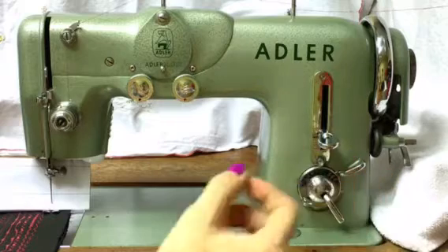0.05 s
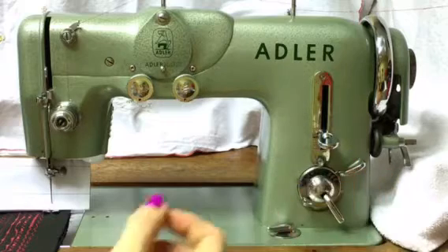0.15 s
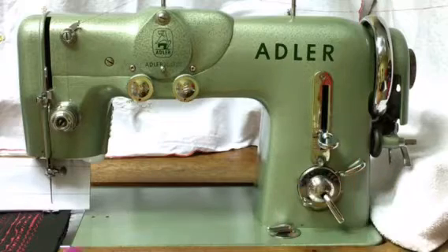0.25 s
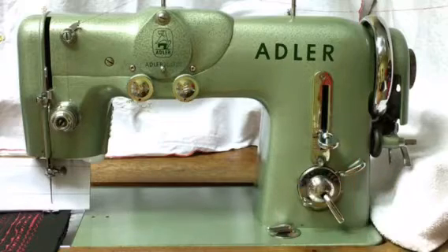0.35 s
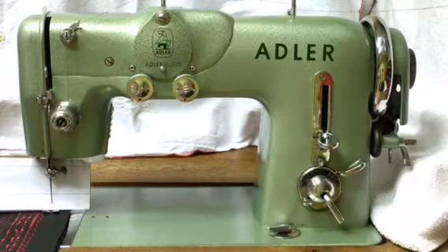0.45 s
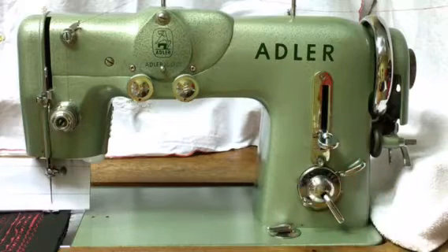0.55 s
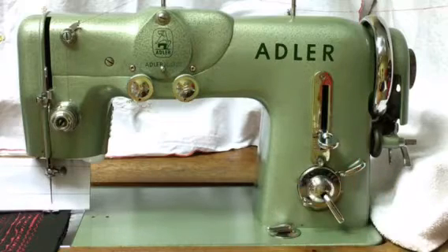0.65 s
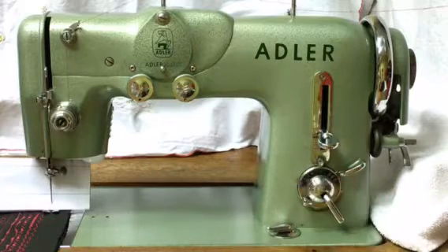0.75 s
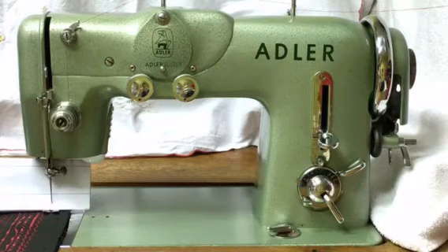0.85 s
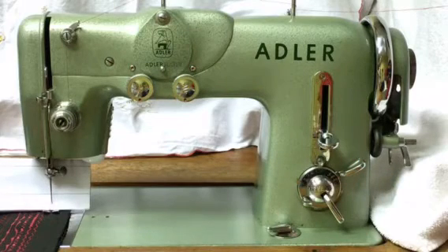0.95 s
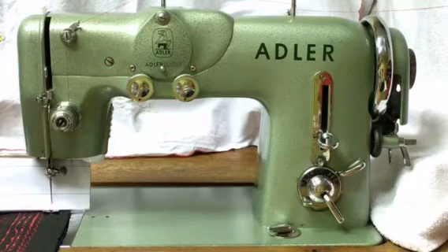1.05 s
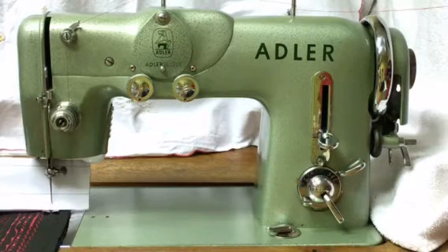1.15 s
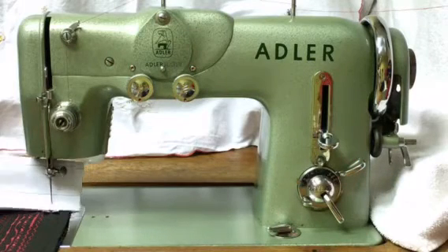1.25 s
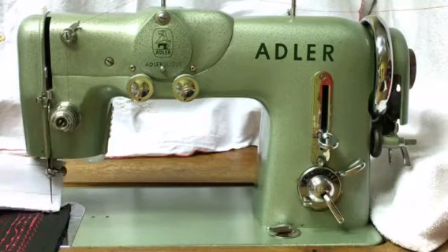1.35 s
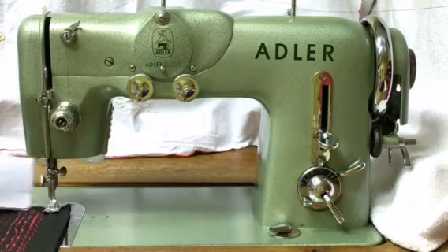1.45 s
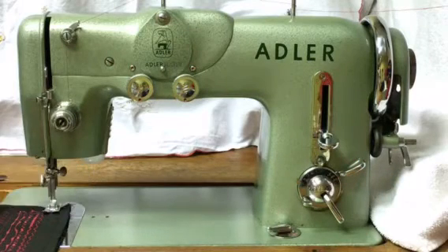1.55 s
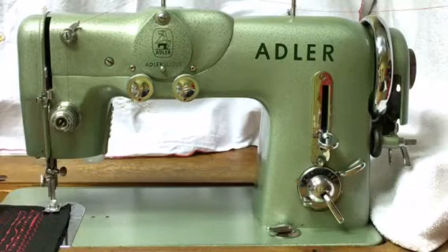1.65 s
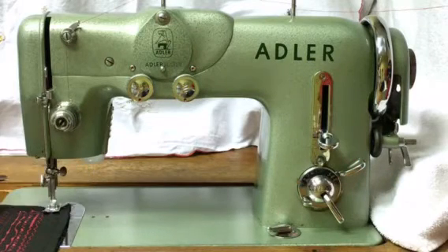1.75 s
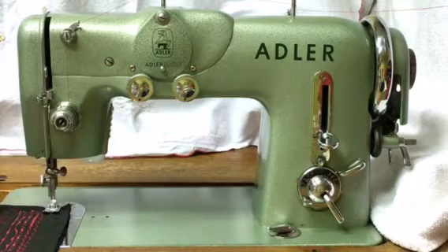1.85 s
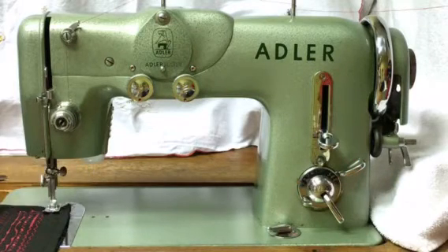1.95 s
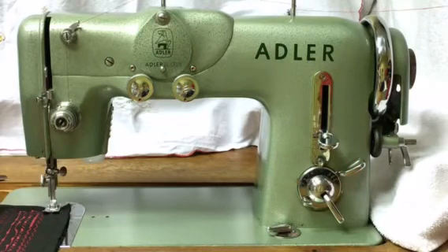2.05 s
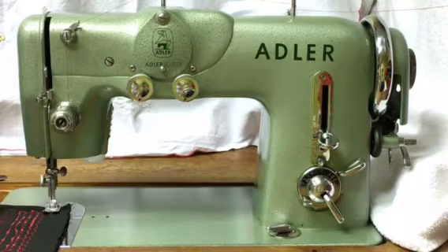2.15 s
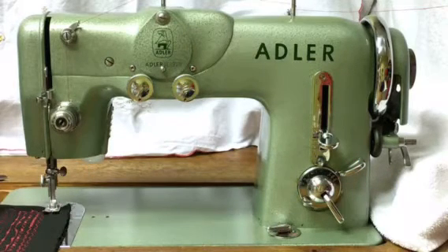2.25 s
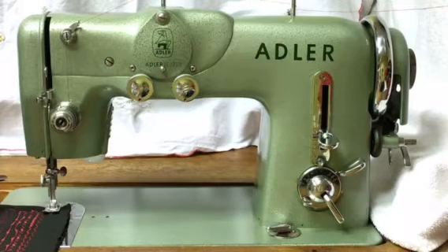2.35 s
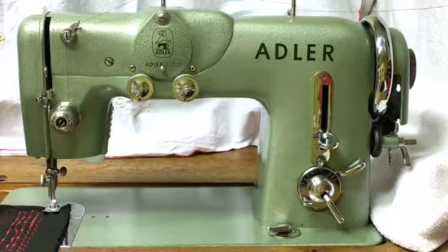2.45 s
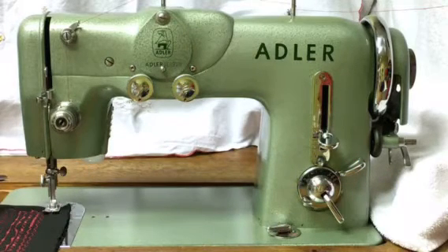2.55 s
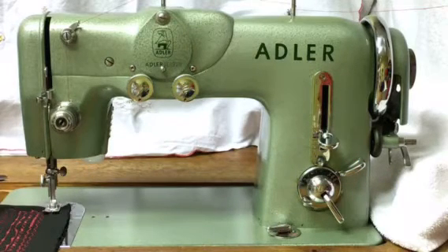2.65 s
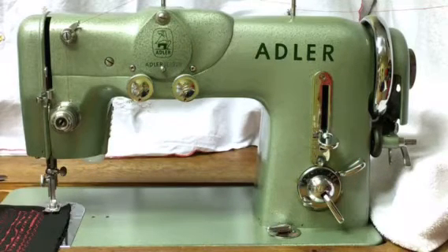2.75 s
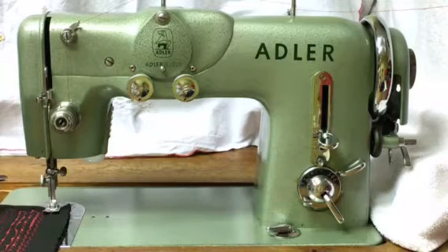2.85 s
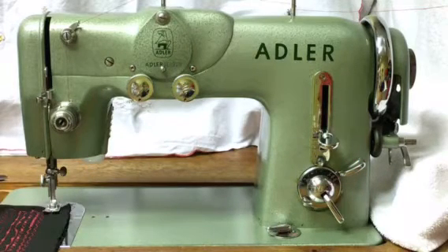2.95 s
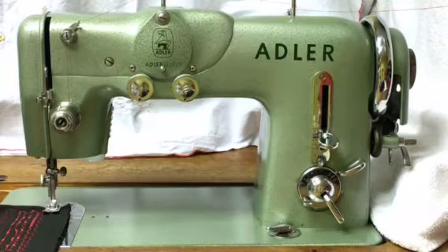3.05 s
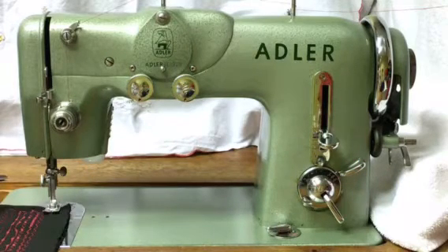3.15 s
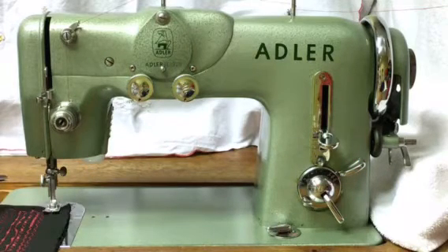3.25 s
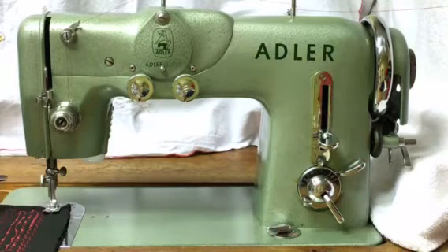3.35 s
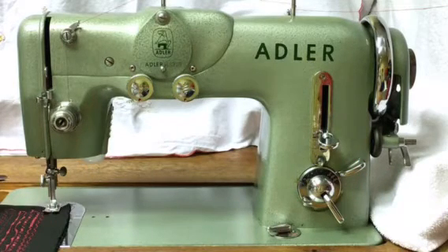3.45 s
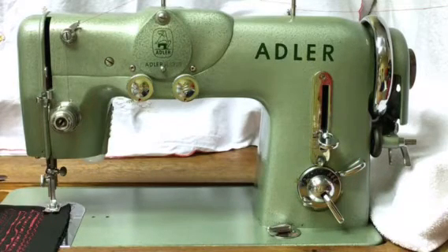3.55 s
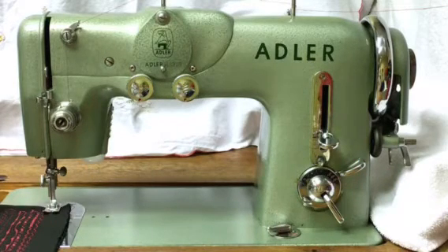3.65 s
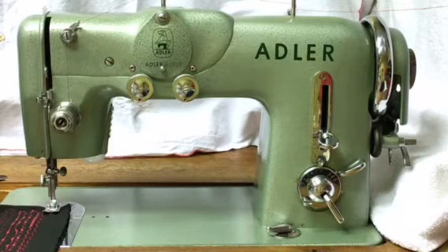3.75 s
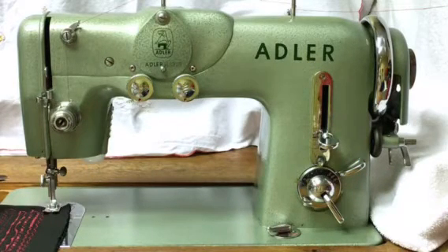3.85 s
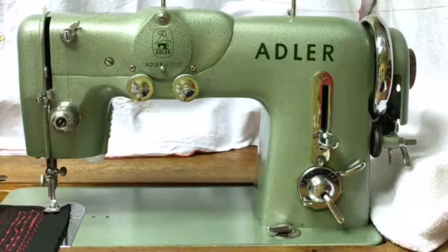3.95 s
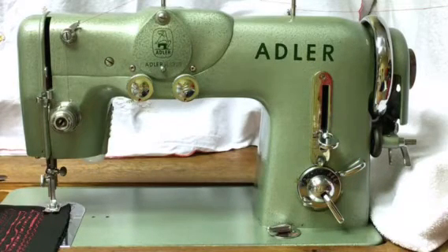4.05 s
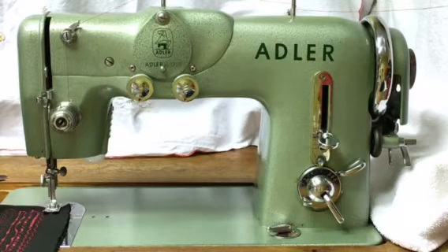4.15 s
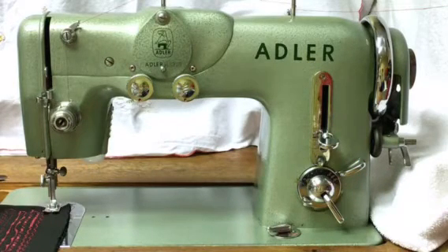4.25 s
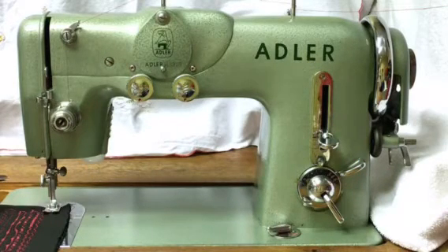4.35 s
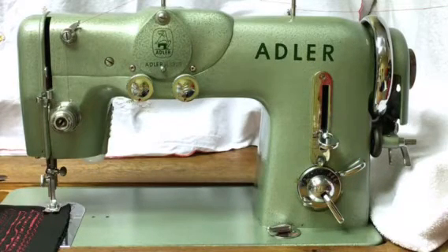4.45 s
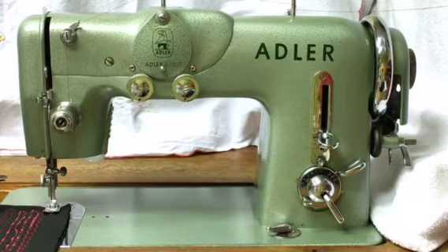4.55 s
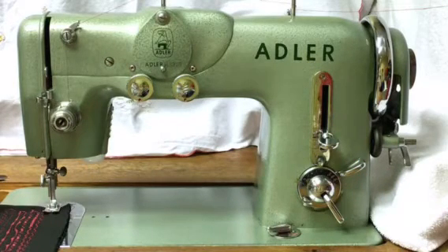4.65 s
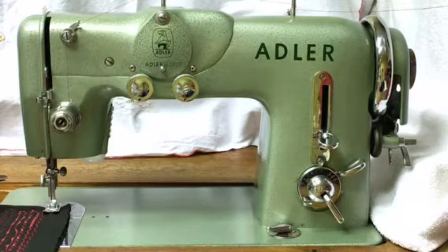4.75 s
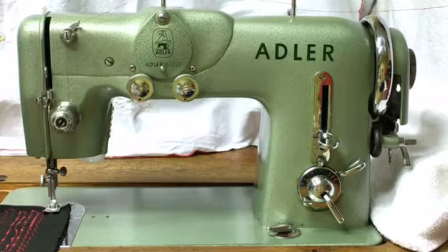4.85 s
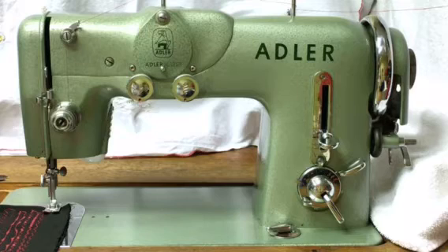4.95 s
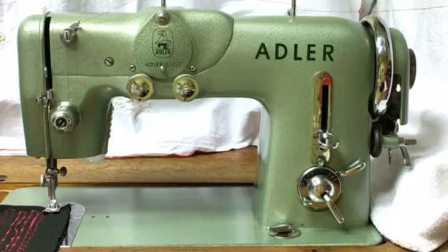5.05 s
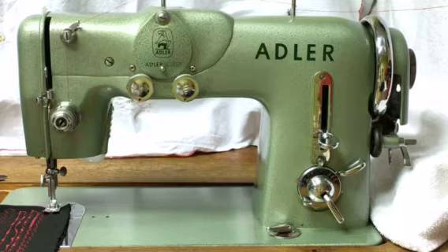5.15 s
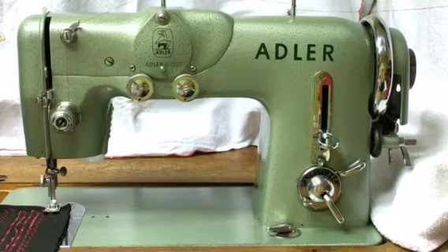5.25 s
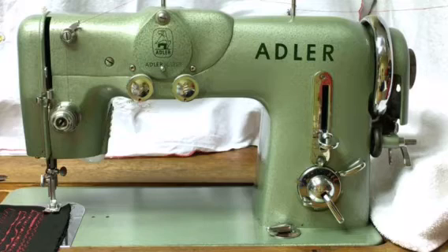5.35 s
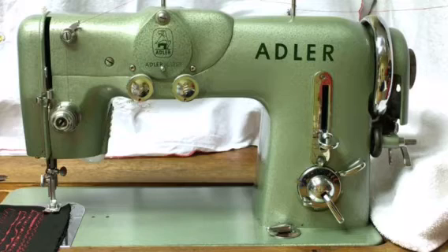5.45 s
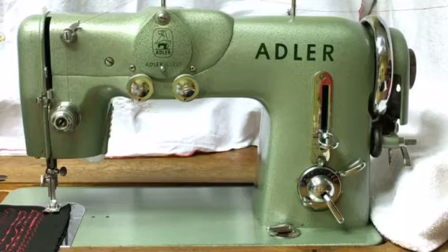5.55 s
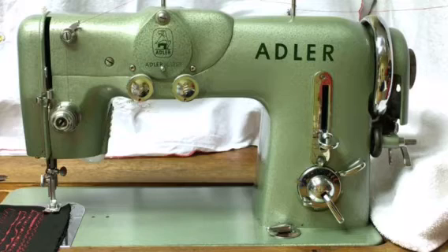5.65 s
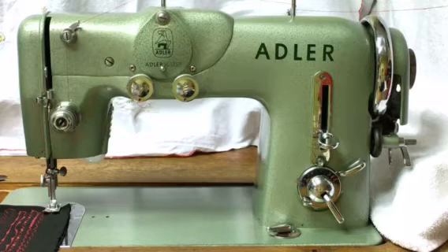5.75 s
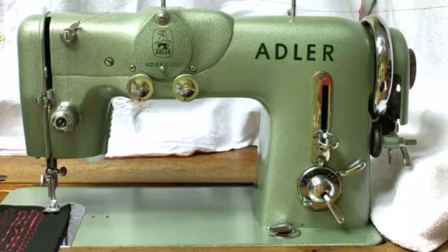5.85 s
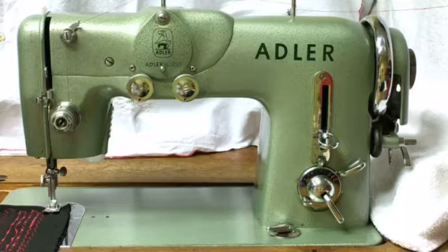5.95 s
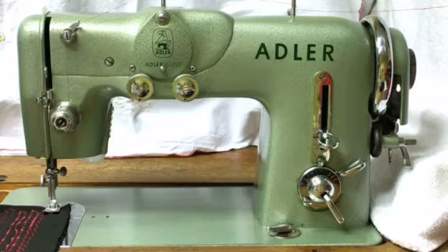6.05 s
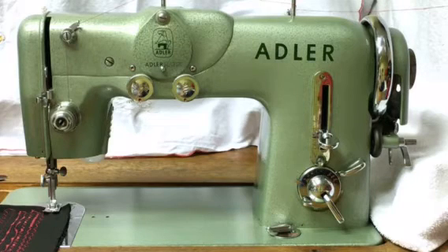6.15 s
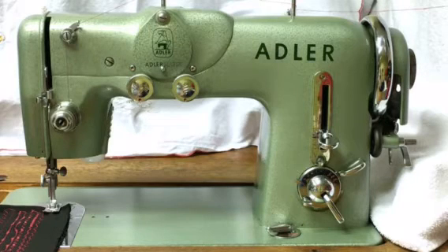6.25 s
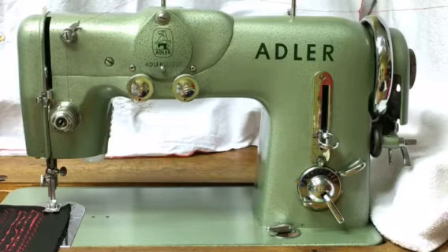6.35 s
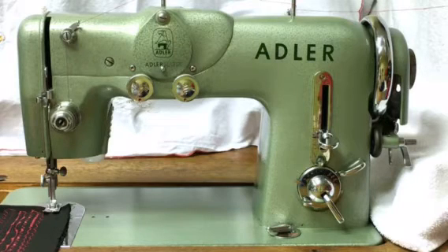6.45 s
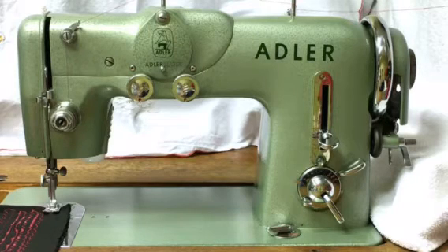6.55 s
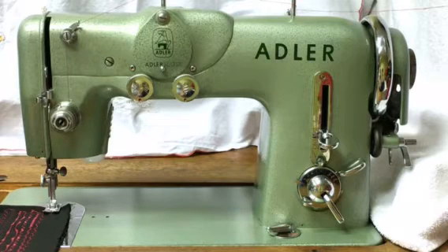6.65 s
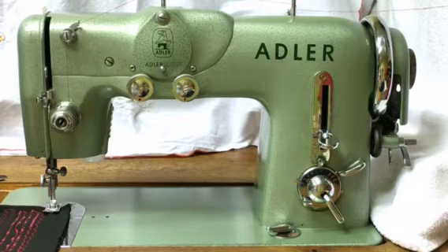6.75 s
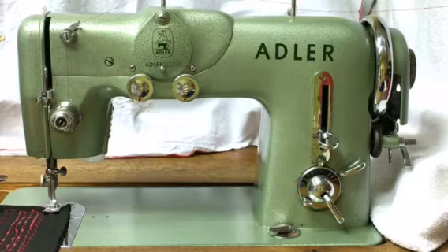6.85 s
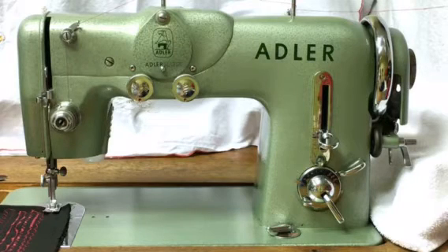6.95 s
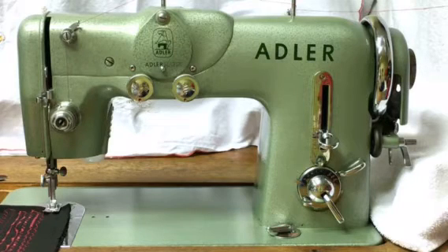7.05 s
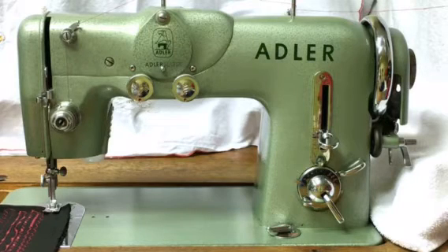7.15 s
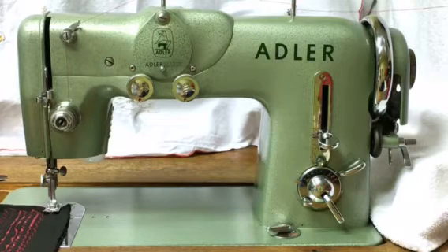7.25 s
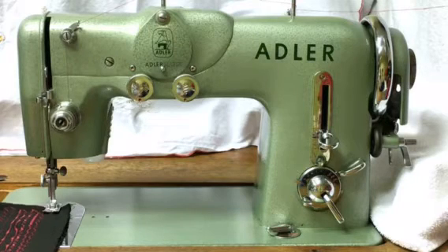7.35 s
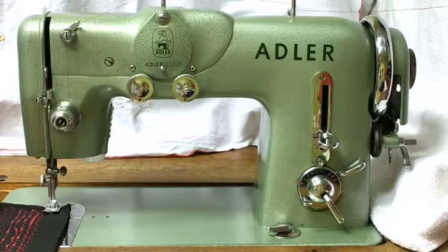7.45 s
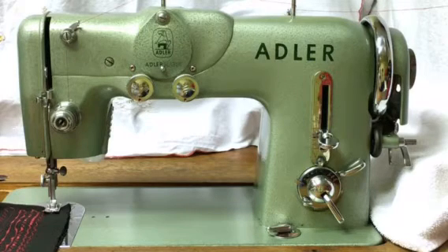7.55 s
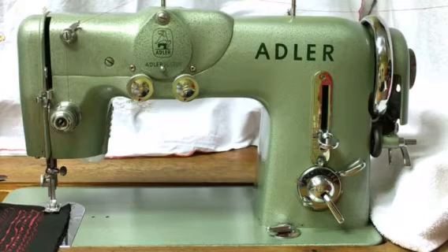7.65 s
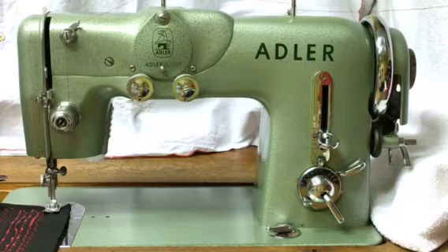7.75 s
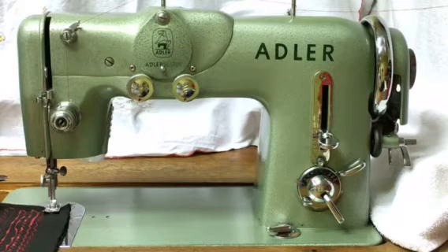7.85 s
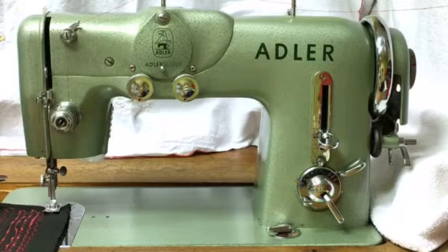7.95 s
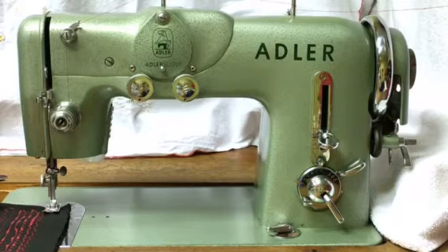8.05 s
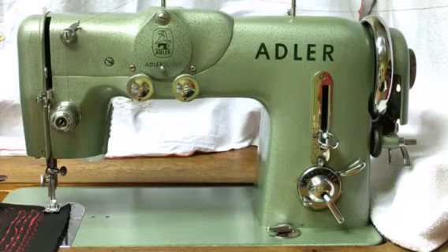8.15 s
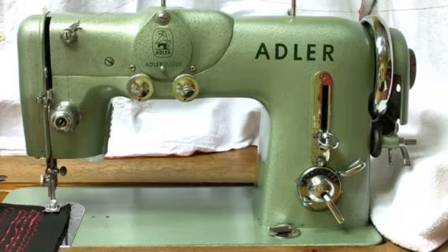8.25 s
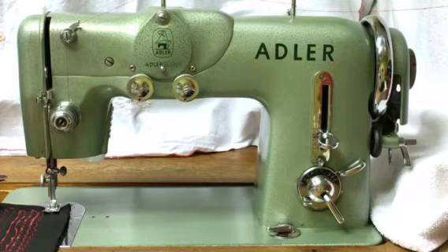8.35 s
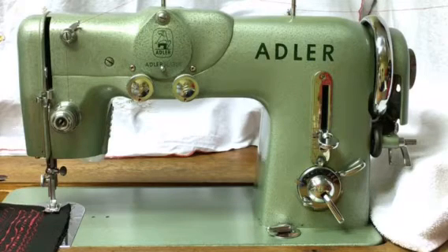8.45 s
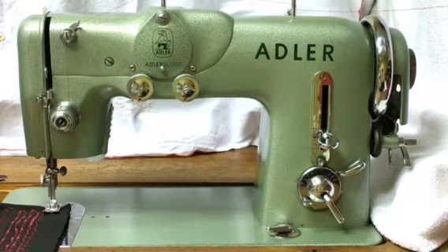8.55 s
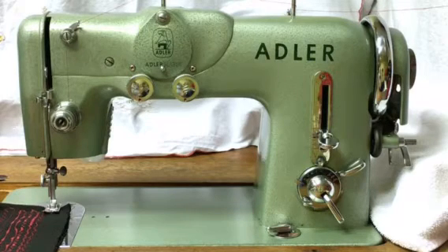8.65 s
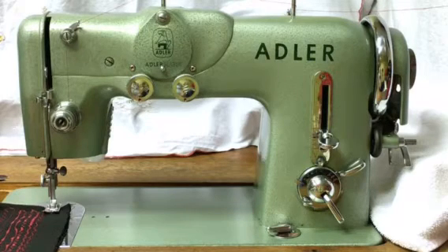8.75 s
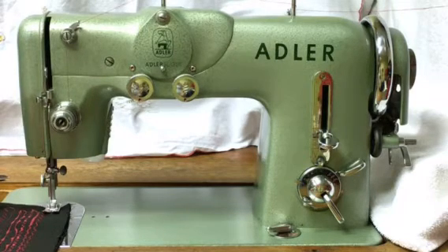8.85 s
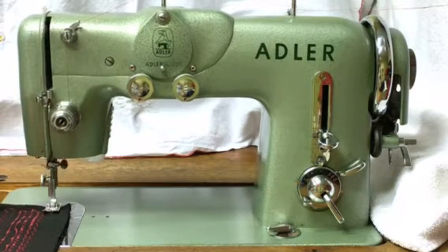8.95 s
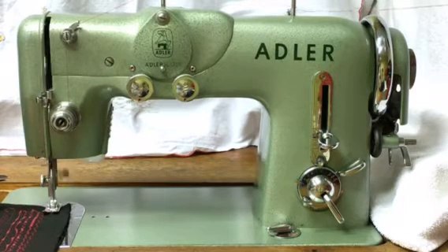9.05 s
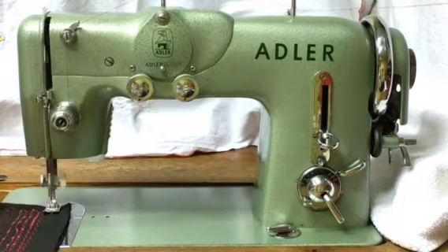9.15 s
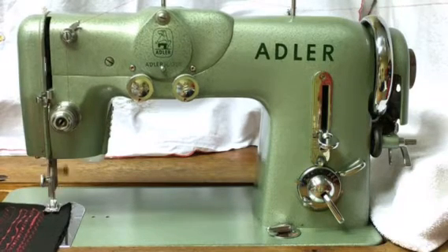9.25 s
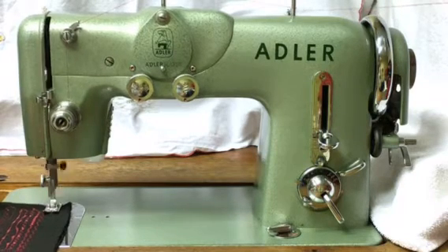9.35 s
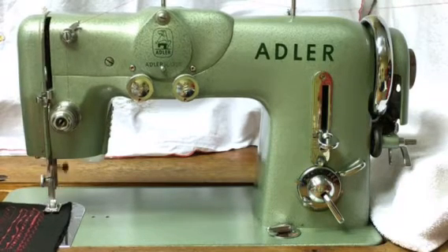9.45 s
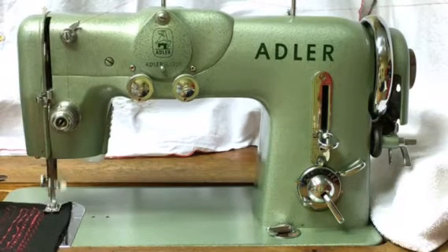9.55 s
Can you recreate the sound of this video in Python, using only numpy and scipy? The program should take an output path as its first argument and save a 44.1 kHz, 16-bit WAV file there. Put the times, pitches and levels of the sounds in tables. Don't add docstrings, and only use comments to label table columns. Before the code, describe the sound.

Old sewing machine motor hums quietly; a sharp click, a stiff paper scrape, small cloth rustles, faint clutch ticks, finally rapid metallic gear clatter.

```python
import sys
import numpy as np
from scipy import signal
from scipy.fft import rfft, irfft
from scipy.io import wavfile
from scipy.ndimage import uniform_filter1d

SR = 44100
rng = np.random.default_rng(int(sys.argv[2]) if len(sys.argv) > 2 else 0)


def materialize(psi):
    bounded = np.clip(np.atleast_2d(psi).T, -1, 1)
    quanta = np.round(bounded * 32767).astype(np.int16)
    wavfile.write(sys.argv[1], SR, quanta)


def undo_db(level):
    steps = np.asarray(level, float) / 20
    return 10 ** steps


N = 422478
T = np.arange(N) / SR
PATCHY_DB = 3


def unit(x):
    return x / np.sqrt(np.mean(x ** 2))


def curves(*tables, off_db=-120):
    s, *columns = np.transpose(np.concatenate(tables))
    return [np.interp(T, s, c, off_db, off_db) for c in columns]


def bursts(rows, rise, fall, rest_db=-120):
    out = np.full(N, float(rest_db))
    for s, length, db in rows:
        before, after = np.maximum(s - T, 0), np.maximum(T - s - length, 0)
        out = np.maximum(out, db - rise * before - fall * after)
    return out


def colour(x, points, size=2048):
    hz, db = np.transpose(points)
    grid = np.log(np.linspace(1, SR / 2, size + 1))
    log_gain = np.log(undo_db(np.interp(grid, np.log(hz), db, -70, -70)))
    cep = irfft(log_gain)
    cep[1:size] *= 2
    cep[size + 1:] = 0
    return signal.fftconvolve(x, irfft(np.exp(rfft(cep))))[:N]


def ring(x, hz, width_hz):
    return signal.lfilter(*signal.iirpeak(hz, hz / width_hz, SR), x)


def ring_twice(x, hz, width_hz, second=1.0):
    return ring(ring(x, hz, width_hz), hz, second * width_hz)


def walk(rate):
    k = int(SR / rate)
    held = np.repeat(rng.standard_normal(N // k + 1), k)
    return 1.435 * uniform_filter1d(uniform_filter1d(held, k), k)[:N]


def grit(rate, spread_db):
    k = int(SR / rate)
    size = undo_db(spread_db * np.minimum(rng.exponential(size=N // k + 1), 3))
    return uniform_filter1d(np.repeat(size, k), k)[:N] * rng.standard_normal(N)


def clicks(rate, spread_db):
    gap, size, sign = rng.random((int(2 * rate * N / SR), 3)).T
    at = np.cumsum((.4 + 1.4 * gap) * SR / rate).astype(int)
    out = np.zeros(at[-1] + N)
    out[at] = np.sign(sign - .5) * undo_db(-spread_db * np.log(np.maximum(size, .15)))
    return unit(out[:N])


def snaps(rows, t60, tone, broad_db):
    rings, broad, t = np.zeros(N + 2048), np.zeros(N + 2048), np.arange(2048) / SR
    for s, db, hz in rows:
        noise = rng.standard_normal(2048)
        start = int(s * SR) - 30
        at = slice(start, start + 2048)
        fade = undo_db(db - 60 * t / t60) * np.minimum(t / 0.00097, 1)
        pitch = 0.53 * np.sin(2 * np.pi * hz * t)
        rings[at] += fade * (pitch + 0.5 * unit(ring(noise, hz, hz / 5)))
        broad[at] += fade * noise * (1 + 0.96 * (np.abs(noise) > 2.2))
    broad_rms = np.sqrt(np.mean(broad ** 2))
    return rings[:N] + undo_db(broad_db) * broad_rms * unit(colour(broad, tone))


PULL_HZ = 99.984
# (time [s], speed [turns/s])
SHAFT = [(0, 24.777), (6.6, 24.777), (7.0, 24.26), (7.2, 23.59), (7.3, 23.54), (7.45, 23.76), (7.6, 23.56),
         (7.7, 23.69), (7.9, 23.33), (8.12, 23.83), (8.22, 23.75), (8.4, 22.86), (8.5, 23.04), (8.7, 23.98),
         (8.9, 23.03), (9.6, 23.4)]
# (time [s], pull tone level [dB], pedal pressure [0-1])
MOTOR = [(0, -50, 0.2), (1.2, -48.5, 0.22), (3.0, -48, 0.13), (4.5, -48.5, 0.21), (5.3, -48, 0.4),
         (5.9, -47, 0.62), (6.65, -45, 0.46), (7.28, -47.5, 1), (7.5, -46.5, 1), (8.43, -48, 0.97),
         (8.73, -46.5, 0.94), (9.05, -50.5, 0.7), (9.6, -46, 1)]
# (time [s], level [dB])
RATTLE = [(0, -1), (2.0, -1.5), (3.25, 5.5), (4.2, 2), (5.7, 5.5), (6.19, -1.5), (6.24, 9), (6.45, 4.5),
          (6.53, -3.5), (9.6, -11)]
# (frequency [Hz], level per Hz [dB])
HOUSING = [(220, -19), (380, 1.5), (517, -3.5), (718, 7), (790, -6), (879, -0.5), (1100, -3.5), (1260, -6),
           (1680, -5.5), (2050, -11), (2260, -6), (2380, -10.5), (2540, -17.5), (3800, -18.5), (4800, -34),
           (6240, -49), (10600, -120)]
# (frequency [Hz], level per Hz [dB])
RUMBLE = [(25, -7), (50, -14), (75, 0), (130, 5.5), (250, 1.5), (330, 1), (480, -14), (800, -14),
          (1100, -46)]


def motor():
    pull_db, pedal = curves(MOTOR)
    play_db, = curves(RATTLE)
    pull = 2 * np.pi * PULL_HZ * T
    speed = np.interp(T, *np.transpose(SHAFT))
    slip = np.minimum(SHAFT[0][1] - speed, 1.2)
    shaft = 2 * np.pi * np.cumsum(speed + 0.128 * slip * walk(30)) / SR
    tones = hum(pull, shaft, slip, pull_db) + rotor_bars(pull, shaft, slip, pedal, play_db)
    gate = np.exp(0.65 * np.cos(pull) + 0.99 * np.cos(pull / 2)
                  + 0.24 * np.cos(shaft + 3.2) + 0.51 * np.cos(pull / 4 + 0.089))
    pulses = np.diff(np.floor(PULL_HZ * T + .2), prepend=-1)
    strikes = pulses * gate * undo_db(2 * walk(PULL_HZ)) * np.sign(rng.standard_normal(N))
    shakes = unit(gate * grit(200, 1.8)) + 1.12 * unit(strikes)
    housing = unit(colour(rng.standard_normal(N) + 0.48 * unit(shakes), HOUSING))
    rumble = unit(colour(rng.standard_normal(N) * undo_db(1.8 * walk(18)), RUMBLE))
    return (np.sqrt(2) * tones
            + undo_db(-64.5 - slip - 3.0) * loose_plates(shakes, pedal, play_db)
            + undo_db(-61.5 - 0.54 * slip + 0.087 * play_db) * housing
            + undo_db(-62.5 + 4.5 * slip) * rumble)


HUM_ORDERS = [(0, 2), (1, -1), (1, 2), (2, -1), (2, 1), (2, 2), (3, -1), (3, 0), (3, 1), (4, 0), (5, 0),
              (5, 2), (5, 9), (5, 11), (9, -2), (9, 0), (4, 2), (3, 12), (6, 1), (12, 0), (13, 1), (14, 0),
              (15, 0), (3, 2), (4, -1), (4, 1), (4, 11), (6, 11), (7, 0), (8, 0)]
HUM_DB = [-71.5, -79, -66.5, -61.5, -62.5, -66.5, -73, -63, -65, -73, -75, -76.5, -69, -74.5, -76.5, -83,
          -76, -72, -74.5, -81.5, -74.5, -74, -75, -79.5, -79.5, -78, -76, -73.5, -91, -77.5]
# (time [s], length [s], depth [dB])
GRABS = [
    (7.24, 0.12, 6),
    (8.2, 0.063, 6),
    (8.39, 0.21, 4.5),
    (8.9, 0.77, 5.5),
]
# (time [s], length [s], gain [dB])
SHUDDERS = [
    (0, 0.71, 2.5),
    (7.84, 0.1, 7),
]


def hum(pull, shaft, slip, pull_db):
    octave_db = -47 - 2.5 * slip - bursts(GRABS, 82, 82, 0)
    octave_db += (0.5 + 0.76 * slip) * walk(16)
    wobble_db = -59.5 + 4 * slip + 0.32 * walk(12)
    tones = undo_db(pull_db) * np.cos(pull - 2.1)
    tones += undo_db(octave_db) * np.cos(2 * pull + 0.82)
    tones += undo_db(wobble_db) * np.cos(pull + shaft + 5.3)
    shudder_db = bursts(SHUDDERS, 60, 30, 0)
    for (a, b), db in zip(HUM_ORDERS, HUM_DB):
        shiver = 0.058 * walk(2.9) + (0.25 if a == 0 else 1.0) * slip * walk(16)
        table_db = shudder_db if a in (2, 3) and b >= 0 else 0
        sway_db = (1.6 if a else 1.2) * walk(5) + 1.6 * slip * walk(12)
        load_db = (2.4 if a == 0 else 1.2 if a < 3 else -3.5) * slip
        phase = a * pull + b * shaft + 2 * np.pi * rng.random() + shiver
        tones += undo_db(db + table_db + sway_db + load_db) * np.cos(phase)
    return tones


BAR_ORDERS = [(1, 23), (3, 23), (4, 23), (7, 23), (8, 23), (9, 23), (3, 46), (4, 46), (5, 46), (6, 46),
              (5, 69), (6, 67), (6, 68), (6, 69), (6, 70)]
BAR_DB = [-86.5, -80, -80.5, -70.5, -75, -83, -76, -78.5, -71, -73.5, -91, -84, -88, -69.5, -82]


def rotor_bars(pull, shaft, slip, pedal, play_db):
    low_db = 5.5 - 14.5 * pedal + 0.7 * play_db
    high_db = -4.5 + 11.5 * pedal
    tones = np.zeros(N)
    for (a, b), db in zip(BAR_ORDERS, BAR_DB):
        if (a, b) == (6, 46):
            load_db = 3.5 * slip
        elif a > 4 and b > 23:
            load_db = high_db - 5 * slip ** 2
        else:
            load_db = low_db
        sway_db = 0.49 * walk(3.7) + 1.4 * walk(13)
        slip_db = slip * (1.5 * walk(13) - (6.9 * slip if b > 46 else 1.5))
        phase = a * pull + b * shaft + 0.77 * slip * walk(40) + 2 * np.pi * rng.random()
        tones += undo_db(db + load_db + sway_db + slip_db) * np.cos(phase)
    return tones


# (frequency [Hz], width [Hz], level [dB], change with the pedal down [dB])
PLATES = [(710, 13, -13, 5), (881, 74, -2, -14), (1232, 245, 0, -7), (1414, 97, -8, 7),
          (1696, 110, -22, 13)]


def loose_plates(shakes, pedal, play_db):
    out = np.zeros(N)
    for hz, width_hz, db, clamp_db in PLATES:
        cover_db = play_db if 800 < hz < 1500 else 0
        level = undo_db(db + clamp_db * pedal + 1.7 * walk(4.32) + cover_db)
        out += level * unit(ring_twice(shakes, hz, width_hz, 0.84))
    return out


# (time [s], level [dB])
GRAZE = [(6.7206, -55), (6.7635, -53), (6.8438, -58), (6.8867, -54), (6.9252, -50), (7.007, -51),
         (7.0449, -51), (7.0888, -56), (7.1327, -50), (7.2265, -46), (7.3074, -60), (7.3474, -61),
         (7.3864, -55), (7.4344, -49), (7.4734, -52), (7.5053, -50), (7.5457, -46), (7.5926, -45),
         (7.6231, -50), (7.661, -48.5), (7.7064, -45), (7.7644, -54), (7.806, -31.5), (7.887, -40),
         (7.9833, -43), (8.0294, -58), (8.074, -52), (8.1184, -48), (8.1584, -50), (8.2013, -47),
         (8.2437, -47), (8.2821, -51)]


def graze():
    touch, t = np.zeros(N), np.arange(3000) / SR
    for s, db in GRAZE:
        t60 = 0.025 if s < SHAFT[3][0] else 0.055
        start = int(s * SR)
        touch[start:start + 3000] += undo_db(db - 7.5) * np.minimum(t / 0.002, 1) * undo_db(-60 * t / t60)
    return touch * unit(ring(colour(rng.standard_normal(N), WHIRR), 11000.0, 10000.0))


# (time [s], level [dB])
STITCH = [(8.88, -85), (8.95, -55), (9.09, -47.5), (9.13, -39.5), (9.23, -34), (9.255, -33.5),
          (9.29, -32.5), (9.32, -38.5), (9.335, -34), (9.365, -35), (9.4, -40), (9.45, -40), (9.5, -36),
          (9.6, -40)]
# (time [s], length [s], level [dB], hiss level [dB])
STROKES = [
    (9.427, 0.0041, -35.5, -38.5),
    (9.52, 0.015, -34.5, -43),
]
# (time [s], length [s], level [dB])
JOLTS = [
    (9.217, 0.032, -27),
    (9.26, 0.053, -31.5),
    (9.412, .004, -32),
    (9.465, 0.062, -31.5),
    (9.52, 0.018, -30),
]
# (frequency [Hz], level per Hz [dB])
GEARS = [(94, -35), (160, -1), (295, -6), (355, -27), (398, -7), (492, -19.5), (788, -8), (908, -20),
         (1060, -11), (2230, -12.5), (4800, -21), (6240, -37), (10600, -120)]
# (frequency [Hz], level per Hz [dB])
WHIRR = [(2710, -26), (4600, -12), (4950, -10.5), (6560, -7), (7430, -11), (9450, -7), (10300, -15.5),
         (11600, -6), (14300, -12.5), (16000, -15)]
# (frequency [Hz], width [Hz], level [dB])
CASTING = [(796, 43, 3), (1040, 110, 4), (1750, 370, 6), (2110, 240, -5), (3370, 60, 2.5), (3790, 68, 3.5),
           (6550, 110, -2), (7100, 110, -7), (9120, 300, -19)]
# (time [s], peak level [dB], ring frequency [Hz])
TEETH = [(9.0855, -45, 1980), (9.0968, -44, 8350), (9.1078, -35, 8290), (9.1187, -35, 9090),
         (9.1299, -36.5, 3380), (9.1411, -30, 9300), (9.1485, -30.5, 1900), (9.1588, -32, 1940),
         (9.1677, -28, 2240), (9.1812, -34, 2110), (9.1856, -32, 2030), (9.191, -38, 2030),
         (9.1942, -37, 1890), (9.2048, -30, 7000), (9.2112, -32, 1830), (9.2182, -27, 1610),
         (9.2239, -32, 8830), (9.2377, -30, 1570), (9.2427, -37, 2050), (9.2481, -24.5, 2380),
         (9.2618, -32, 1790), (9.2744, -31, 3400), (9.2795, -32, 2150), (9.2953, -31, 8830),
         (9.3067, -32, 8460), (9.3127, -32, 6840), (9.3191, -32, 1800), (9.3254, -27.5, 2240),
         (9.3315, -29, 2260), (9.3393, -26, 9070), (9.3546, -41, 2200), (9.3763, -31, 2070),
         (9.3873, -40, 1770), (9.3941, -39, 1720), (9.3987, -36, 1810), (9.4098, -31, 1850),
         (9.4296, -31, 2150), (9.4354, -29, 8500), (9.4572, -45, 2200), (9.4676, -33, 1940),
         (9.4929, -38, 1960), (9.499, -34, 3400), (9.5107, -28, 3320), (9.5156, -26.5, 3600),
         (9.5311, -31, 9090), (9.5402, -27.5, 2220), (9.544, -31, 1980), (9.555, -38, 6160)]
# (frequency [Hz], level per Hz [dB])
STRIKE_TONE = [(500, -20), (1100, 0), (2200, 0), (3600, -8), (4900, -13), (6600, -6), (9300, -7),
               (10400, -10), (12000, -4), (16000, -14)]


def needle():
    run_db, = curves(STITCH)
    strokes = np.array(STROKES)
    gear_db = np.maximum(run_db, bursts(strokes[:, [0, 1, 2]], 307, 307))
    whirr_db = np.maximum(run_db - 4, bursts(strokes[:, [0, 1, 3]], 307, 307))
    boom_db = bursts(JOLTS, 1500, 249) + 1.7 * walk(50)
    sway = 2 * np.pi * 130.4 * (T - 9.2226) + np.pi / 2 + .25 * walk(11) + 0.11 * walk(45)
    boom = np.sqrt(2) * undo_db(boom_db) * np.sin(sway)
    clatter = 1.07 * unit(grit(250, 1.2)) + 0.46 * clicks(120, 2.7)
    casting = unit(sum(undo_db(db + PATCHY_DB * walk(30)) * unit(ring(clatter, hz, width_hz))
                       for hz, width_hz, db in CASTING))
    hits = snaps(TEETH, 0.026, STRIKE_TONE, broad_db=-5.0)
    hits = hits + 0.76 * sum(undo_db(db) * ring(hits, hz, width_hz) for hz, width_hz, db in CASTING[4:])
    gears = unit(colour(clatter, GEARS)) + undo_db(-5) * casting
    whirr = unit(colour(clatter * undo_db(walk(40)), WHIRR))
    return boom + undo_db(gear_db - 3.5) * gears + undo_db(whirr_db - 3.5) * whirr + 0.85 * hits


PARTS = {"lever": (3300, 2300), "plate": (3300, 1350), "sheet": (5800, 2150), "cam": (5500, 1350),
         "pin": (9400, 1400), "bed": (2600, 1040), "arm": (3300, 1800), "hook": (6500, 2250),
         "fold": (4300, 2250)}
BROAD = {"fold": 0.1}
# (time [s], peak level [dB], body level
# [dB], part)
TAPS = [(0.0494, -48, -12, "pin"), (0.5585, -23, -12.5, "lever"), (0.5664, -23.5, -15, "lever"),
        (0.573, -28.5, -6, "cam"), (1.2756, -39, 8, "sheet"), (1.328, -23.5, -1.5, "sheet"),
        (1.3717, -22, -27, "sheet"), (1.4896, -34, -3, "fold"), (1.547, -39, 1, "sheet"),
        (1.503, -42, 5, "fold"), (1.5532, -31.5, -9, "lever"), (1.656, -27, -11.5, "fold"),
        (2.504, -52, 11, "lever"), (2.5421, -42, 3, "cam"), (2.6715, -52, 5, "fold"),
        (2.687, -26.5, -12, "bed"), (2.7, -34, -1.5, "plate"), (2.8704, -46, 12, "arm"),
        (3.267, -56, 9, "plate"), (5.6284, -43, -8, "bed")]
# (time [s], peak level [dB], body level [dB], part)
CATCHES = [(6.6867, -44, -7, "pin"), (6.697, -56, 10, "arm"), (6.897, -62, 8, "arm"),
           (7.068, -58, 13, "arm"), (7.067, -62, 11, "bed"), (7.224, -46.5, 8, "plate"),
           (7.806, -34, -4, "cam"), (7.8875, -34, -6, "cam"), (7.983, -40.5, -1, "pin"),
           (8.0286, -44, -5, "arm"), (8.117, -46, -9, "arm"), (8.158, -47, -7, "arm"),
           (8.201, -40, -2.5, "cam"), (8.2426, -39.5, -4, "plate"), (8.282, -40.5, -1, "pin")]
# (time [s], peak level [dB], body level [dB], part)
KNOCKS = [(8.9608, -34.5, -17, "arm"), (8.991, -35, -9, "lever"), (9.034, -60, 35, "bed"),
          (9.071, -30, -20, "sheet"), (9.0761, -22.5, -9, "arm"), (9.117, -31, -2, "lever"),
          (9.2223, -22.5, 1, "bed"), (9.246, -24, -8, "hook"), (9.2726, -26, -11, "lever"),
          (9.3102, -21, 1, "arm"), (9.3254, -21, -18, "lever"), (9.3393, -25, -6, "hook"),
          (9.428, -19.5, -7, "hook"), (9.4973, -27, 2, "lever"), (9.5146, -18.5, -4, "arm"),
          (9.5404, -35, -7, "lever")]


def ticks():
    cracks, knocks = np.zeros((2, N + 4096))
    t = np.arange(4096) / SR
    tail = undo_db(-60 * t / 0.036) + 0.085 * undo_db(-60 * t / 0.17)
    body_fade = undo_db(-60 * t / 0.051) * np.minimum(t / 0.0012, 1)
    for s, db, body_db, part in TAPS + CATCHES + KNOCKS:
        hz, body_hz = PARTS[part]
        noise = rng.standard_normal((2, 4096))
        noise[:, 0] = 7.5, 3.0
        crack = BROAD.get(part, 0.6) * np.minimum(noise[0], 3.0) + 1.14 * ring(noise[0], hz, 0.16 * hz)
        knock = ring(noise[1], body_hz, 0.2 * body_hz) + 0.62 * ring(noise[1], 540.0, 500.0)
        at = slice(int(s * SR), int(s * SR) + 4096)
        cracks[at] += undo_db(db) * crack * tail
        knocks[at] += undo_db(db + body_db) * knock * body_fade
    return 0.56 * colour(cracks, CLOTH_TONE) + 1.82 * knocks[:N]


# (time [s], level [dB])
DRAG = [(1.185, -88), (1.195, -62), (1.272, -58.5), (1.276, -44.5), (1.4, -42.5), (1.47, -42.5),
        (1.51, -60), (1.556, -54), (1.6, -100)]
# (frequency [Hz], level per Hz [dB])
DRAG_TONE = [(880, -79), (1500, 3), (2140, 7.5), (2910, 1), (3410, 3), (6060, -1.5), (10600, -17),
             (12400, -7), (16000, -12)]
# (frequency [Hz], width [Hz], level [dB], taut from [s], taut to [s])
PAPER = [(2120, 220, 5, 1.33, 1.43), (3400, 130, 1, 1.28, 1.33), (4480, 200, -8, 1.1, 1.3),
         (5800, 260, 2.5, 1.275, 1.39), (7800, 260, -1, 1.7, 1.5)]
# (time [s], length [s], level [dB])
SNAGS = [
    (1.329, 0.012, -35),
    (1.371, 0.0053, -37.5),
]
# (time [s], peak level [dB], ring frequency [Hz])
CRACKS = [(1.1862, -62, 2330), (1.1963, -51, 3210), (1.2053, -46, 6910), (1.2108, -47, 2330),
          (1.2161, -46, 6010), (1.2268, -40.5, 5430), (1.2412, -51, 5710), (1.2509, -48, 3490),
          (1.2673, -40, 5530), (1.2756, -29, 5660), (1.282, -30, 4570), (1.2921, -31, 4540),
          (1.2996, -27.5, 4520), (1.3087, -30, 6050), (1.3159, -30, 6220), (1.3205, -36, 5840),
          (1.3307, -26, 7660), (1.3348, -29, 5750), (1.3413, -31, 5790), (1.3552, -28, 4290),
          (1.363, -32, 6120), (1.3735, -28.5, 6270), (1.3804, -31, 6180), (1.3894, -32, 6250),
          (1.4021, -31, 4700), (1.4093, -37, 5300), (1.4125, -33, 2200), (1.4215, -34, 2170),
          (1.4371, -37, 4480), (1.4469, -38, 5750), (1.4593, -41, 4200), (1.4734, -44, 3210),
          (1.4905, -38, 3550), (1.4936, -47, 3700), (1.5043, -45, 2840), (1.5163, -48, 5020)]


def paper():
    level_db = np.maximum(curves(DRAG)[0], bursts(SNAGS, 4000, 306))
    slips = unit(grit(700, 1.8))
    cracks = np.interp(T, [1.39, 1.45], [.5, .35]) * clicks(350, 2.4)
    sheet = np.zeros(N)
    for hz, width_hz, db, first, last in PAPER:
        taut_db = bursts([(first, last - first, db)], 600, 600, db - 8)
        sheet += undo_db(taut_db + 1.9 * walk(31.3)) * ring(0.59 * slips + cracks, hz, 2.2 * width_hz)
    body = unit(ring(grit(150, 1.2), 550.0, 1100.0))
    pops = snaps(CRACKS, 0.014, DRAG_TONE, broad_db=-6.5)
    pops = pops + 0.64 * sum(ring(pops, hz, width_hz) for hz, width_hz, *_ in PAPER)
    scrape = unit(colour(slips + 0.74 * cracks, DRAG_TONE))
    return pops + undo_db(level_db - 4) * (1.05 * scrape + 0.79 * unit(sheet) + undo_db(-7.5) * body)


# (time [s], length [s], level [dB])
CLUNK = (9.02, 0.036, -46.5)
# (frequency [Hz], width [Hz], level [dB])
CLUNK_MODES = [(1080, 160, 0), (1980, 310, -0.5), (2280, 330, -0.5)]


def clunk():
    shove = undo_db(bursts([CLUNK], 970, 1500)) * rng.standard_normal(N)
    return sum(undo_db(db + 19.0) * ring_twice(shove, hz, width_hz, 1.6) for hz, width_hz, db in CLUNK_MODES)


# (time [s], length [s], level [dB], dull share [dB])
RUBS = [(0.096, .01, -75, 14), (.2, 0.13, -78, 13), (0.402, 0.011, -68, 9), (0.57, 0.093, -75, 16),
        (1.686, .05, -69, -10), (1.75, 0.07, -62, -7), (1.823, 0.023, -64, -7), (1.946, 0.015, -67.5, 8),
        (2.05, 0.075, -71, -2), (2.21, 0.035, -69, 11.5), (2.287, 0.012, -58.5, 2), (2.43, 0.034, -58, 1),
        (2.559, 0.017, -56.5, 3), (2.657, 0.18, -61, 4), (2.802, 0.11, -59, 5), (2.998, 0.034, -67, 5),
        (3.08, 0.27, -73, 6), (3.608, 0.65, -74.5, 2), (4.167, 0.14, -66.5, -11), (4.356, 0.0098, -62, 2),
        (4.407, 0.091, -67, -7), (4.6, 0.11, -75, 8), (5.058, 0.036, -72.5, 18), (5.16, 0.3, -73.5, 10),
        (5.637, .01, -73, 5), (6.327, .02, -71, 2), (6.46, .01, -72, 7)]
# (frequency [Hz], level per Hz [dB])
CLOTH_TONE = [(1600, -19), (2700, -7), (3500, -0.5), (4300, -6.5), (4930, -6.5), (6030, -1.5), (7600, -8.5),
              (9220, -2.5), (10300, -10), (11700, -5.5), (14900, -6.5), (16000, -13)]
# (time [s], length [s], level [dB])
CREEPS = [
    (6.72, .4, -77),
    (7.2, 0.17, -64.5),
    (7.32, 0.65, -70),
    (7.75, .55, -74),
    (8.42, 0.17, -59),
    (8.68, 0.2, -68.5),
    (8.92, 0.079, -57.5),
]
# (frequency [Hz], width [Hz], level [dB])
BELT = [(3220, 400, 10.5), (5340, 110, -3), (6250, 260, -13), (8700, 370, -16)]


def cloth():
    fibres = colour(grit(300, 2.3), CLOTH_TONE)
    rub = unit(sum(undo_db(PATCHY_DB * walk(14)) * ring(fibres, hz, hz / 1.2)
                   for hz in (2750.0, 4700.0, 7060.0, 9700.0, 12000.0)))
    folds = unit(ring(grit(200, 2.3), 1700.0, 2100.0))
    bright_db = bursts([(s, length, db) for s, length, db, _ in RUBS], 195, 200, -78)
    dull_db = bursts([(s, length, db + dull) for s, length, db, dull in RUBS], 195, 200, -79)
    slide = rng.standard_normal(N)
    modes = unit(sum(undo_db(db + PATCHY_DB * walk(12)) * unit(ring(slide, hz, width_hz))
                     for hz, width_hz, db in BELT))
    belt = 0.85 * unit(colour(slide, CLOTH_TONE)) + 0.65 * unit(ring(slide, 2550.0, 1200.0)) + 0.69 * modes
    creep = undo_db(bursts(CREEPS, 86, 86)) * belt * (T < STITCH[1][0])
    return undo_db(0.53 * walk(23)) * (undo_db(bright_db) * rub + undo_db(dull_db - 8.5) * folds + creep)


# (time [s], length [s], level [dB], frequency [Hz])
SCUFFS = [
    (0.58, .025, -61, 3420),
    (2.27, .02, -66, 6440),
    (2.428, .015, -66, 4050),
    (2.682, .02, -59, 1110),
    (2.693, 0.016, -71, 3520),
    (2.81, 0.018, -59, 3840),
    (1.94, 0.024, -69, 9300),
]


def scuffs():
    noise = grit(400, 2.7)
    return sum(undo_db(bursts([(s, length, db)], 580, 540)) * unit(ring_twice(noise, hz, hz / 6))
               for s, length, db, hz in SCUFFS)


# (time [s], level [dB])
CREAK = [
    (5.85, -74),
    (6.456, -65),
    (6.6, -78),
]


def pedal():
    return undo_db(curves(CREAK)[0]) * unit(ring_twice(grit(55, 2.6), 1900.0, 200.))


def room(x):
    t60_s, tail_db = 0.25, -10.5
    t = np.arange(int(.5 * SR)) / SR
    tail = rng.standard_normal(len(t)) * undo_db(-60 * t / t60_s) * (t > .004)
    return x + undo_db(tail_db) * signal.fftconvolve(x, tail / np.sqrt(np.sum(tail ** 2)))[:N]


# (frequency [Hz], level per Hz [dB])
HISS = [(2590, -3.5), (4400, 1.5), (4900, -17), (5520, -9), (12000, -10.5), (15200, -12), (16000, -27)]


def microphone_hiss():
    return undo_db(-74.5) * unit(colour(rng.standard_normal(N), HISS))


def scene():
    close = motor() + graze() + needle() + cloth() + scuffs() + pedal()
    distant = room(ticks() + paper() + clunk())
    return (close + distant + microphone_hiss())[None]


def top_cut(x):
    return signal.sosfilt(signal.butter(12, 16630, fs=SR, output="sos"), x)


def record(dry):
    low_pass = signal.ellip(10, .2, 60, 15850, fs=SR, output="sos")
    mix = signal.sosfilt(low_pass, dry)
    return top_cut(mix)


dry = scene()
out = record(dry)
materialize(out)
```